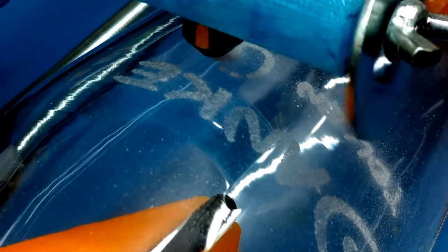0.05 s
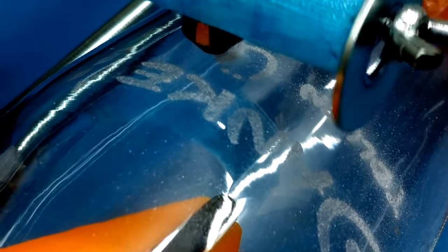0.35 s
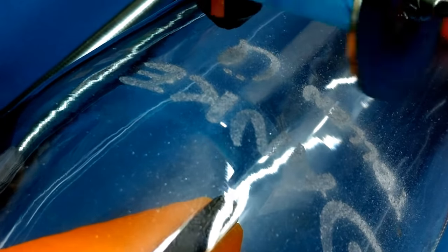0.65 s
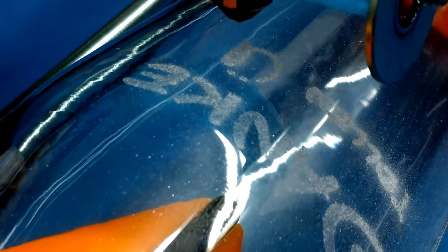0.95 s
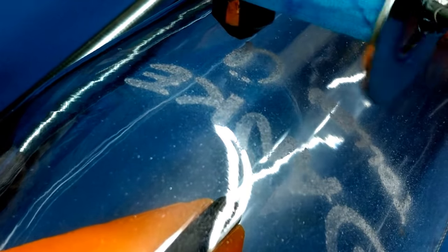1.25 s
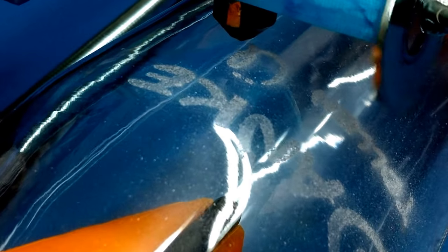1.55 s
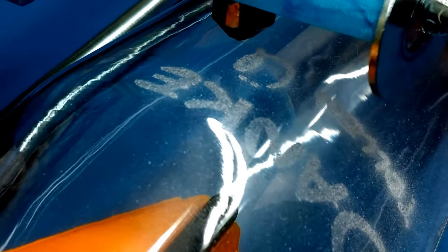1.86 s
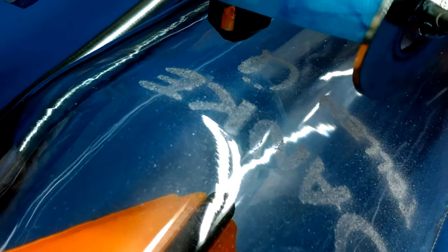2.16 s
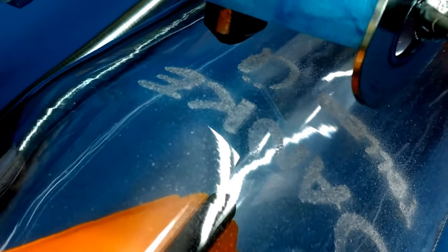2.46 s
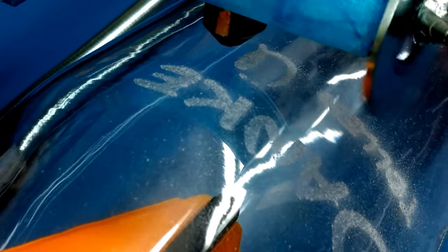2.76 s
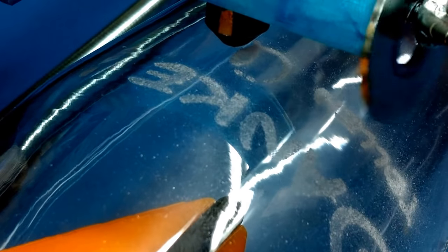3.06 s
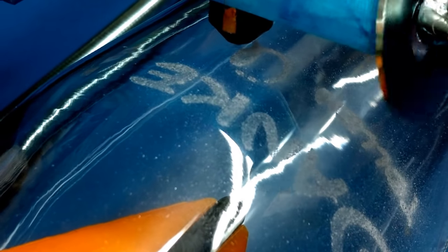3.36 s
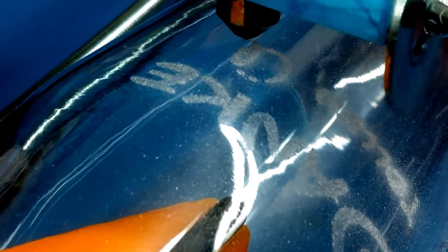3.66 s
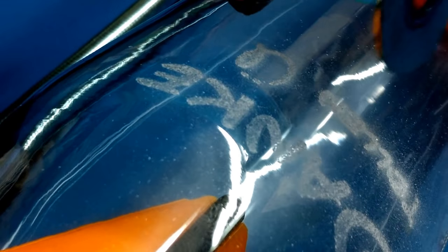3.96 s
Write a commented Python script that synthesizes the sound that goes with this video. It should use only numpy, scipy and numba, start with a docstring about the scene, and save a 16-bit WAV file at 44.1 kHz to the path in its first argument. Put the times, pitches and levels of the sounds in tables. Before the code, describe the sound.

Glass rings shrilly in uneven swells as an engraving tool scrapes it, heard close up without any room sound. After a brief stroke the motor hums, whistles and hisses alone, until a tick starts a second, longer stretch of grinding.

```python
"""A glass vessel rings loudly in its own modes as a small rotary engraver grinds letters into its wall.
The gritty burr chatters and scrapes, and the ring swells irregularly. The burr lifts and the ring dies,
then it lands with a tick for a second, longer stroke. The motor hums, whistles and hisses throughout.
Heard close to the vessel, through the two microphone ports of a camera, with no room sound."""
import sys
import numpy as np
from scipy import signal
from scipy.fft import rfft, irfft
from scipy.io import wavfile
from numba import njit

SR = 44100
rng = np.random.default_rng(int(sys.argv[2]) if len(sys.argv) > 2 else 0)


def inscribe(sig):
    """Save sig as 16-bit PCM at rate SR to the path in sys.argv[1].

    A 1-D sig is mono; a 2-D sig holds one channel per row.
    Samples are clipped to [-1, 1] before scaling.
    """
    pcm = np.round(np.clip(np.atleast_2d(sig).T, -1, 1) * 32767)
    wavfile.write(sys.argv[1], SR, pcm.astype(np.int16))


N = 176400
TIME, BINS = np.arange(N) / SR, np.fft.rfftfreq(N, 1 / SR)


def amp(db):
    """Decibels to gain."""
    return 10 ** (np.asarray(db) / 20)


def unit(x):
    """Scales to rms 1."""
    return x / np.sqrt(np.mean(x ** 2) + 1e-20)


def spectrum(points):
    """Reads a table on a log-frequency axis."""
    hz, value = np.transpose(points)
    return np.interp(np.log(BINS + 1), np.log(hz + 1), value)


def curve(rows, column=1):
    """Reads one column of a table over time."""
    rows = np.array(rows)
    return np.interp(TIME, rows[:, 0], rows[:, column])


def drift(rate_hz):
    """A random wander of rms 1, mostly slower than rate_hz."""
    return unit(irfft(rfft(rng.standard_normal(N)) / np.sqrt(1 + (BINS / rate_hz) ** 4), N))


def band(x, hz, width_hz):
    """A band-pass with gain 1 at its centre."""
    return signal.lfilter(*signal.iirpeak(hz, hz / width_hz, SR), x)


# How alike a noise arrives at the two microphone ports (frequency [Hz], likeness [0-1])
PORT_LIKENESS = [(100, 0), (500, 0.3), (1000, 1), (1400, 0.02), (2000, 0.99), (5000, 1), (9000, 0.32),
                 (14000, 1)]

def stereo_noise(pair, colour):
    """Two unrelated white signals become a partly alike left and right with the given spectrum."""
    left, other = rfft(pair)
    alike = np.clip(spectrum(PORT_LIKENESS), 0, 1)
    right = alike * left + np.sqrt(1 - alike ** 2) * other
    return irfft(np.array([left, right]) * amp(spectrum(colour)), N) * np.sqrt(SR / 2)


# Hiss of the brushes and fan, close up (frequency [Hz], density [dB per Hz])
HISS_SPECTRUM = [(30, -103), (100, -109), (300, -89.5), (520, -77), (1000, -82.5), (1400, -84.5),
                 (1900, -84), (3000, -78), (3900, -71.5), (4600, -81.5), (6300, -76), (8000, -76.5),
                 (9500, -81.5), (12600, -83), (13500, -80), (14400, -82), (15400, -98)]

def motor_hiss(turns):
    """Brushes and fan hiss, throbbing with each turn and fluttering at random."""
    throb = 1 + 0.13 * np.cos(2 * np.pi * turns)
    flutter = amp(1.83 * drift(rate_hz=35))
    return stereo_noise(rng.standard_normal((2, N)) * unit(throb * flutter), HISS_SPECTRUM)


# Thin whistles of the running tool (frequency [Hz], half-width [Hz], relative level [dB])
WHISTLE_BANDS = [(7858, 8, -50), (7982, 8, -52.5), (8220, 10, -54)]

def motor_whistles():
    """Very narrow bands of noise whistle high above the hum."""
    whistles = np.zeros(N)
    for hz, half_width, db in WHISTLE_BANDS:
        peak = rfft(rng.standard_normal(N)) / (1 + ((BINS - hz) / half_width) ** 2)
        whistles += amp(db) * unit(irfft(peak, N))
    return whistles


# Partials of the hum (multiple of shaft speed, relative level idling [dB], relative level cutting [dB])
SHAFT_ORDERS = [(1, -48, -51), (2, -45, -53), (3, -44, -57), (4, -57, -60), (5, -51, -47), (7, -52, -58),
                (9, -56, -58), (15, -52, -56), (16, -57, -62), (35, -49, -60), (36, -58, -68)]

def motor_hum(touch, turns):
    """The shaft hums at multiples of its speed; their balance shifts while the burr cuts."""
    hum = np.zeros(N)
    for order, idle_db, cut_db in SHAFT_ORDERS:
        level_db = idle_db + touch * (cut_db - idle_db) + 2.5 * drift(rate_hz=16.4)
        hum += amp(level_db) * np.sqrt(2) * np.sin(2 * np.pi * (order * turns + rng.random()))
    return hum


# The motor at the microphone as the tool moves (time [s], level [dB])
MOTOR_LEVEL = [(0, 1), (.35, -3.5), (.47, -2), (.8, 0.5), (1.13, 1.5), (1.22, -2), (1.5, -2.5), (3.7, -2.5),
               (3.8, -2), (4, -3)]

def motor(touch, turns, tones_db=-1):
    """The running tool is the background: hum, whistles and hiss swell and sink together."""
    tones = motor_hum(touch, turns) + motor_whistles()
    return (amp(tones_db) * tones + motor_hiss(turns)) * amp(curve(MOTOR_LEVEL))


# Strokes of the burr on the vessel's wall (touch [s], lift [s])
BURR_STROKES = [(-.1, 0.362), (1.217, 3.755)]

def release_hum(hz=160, swell_s=0.0287, lead_s=0.071):
    """The whole vessel swings softly as each stroke lets go."""
    hum = np.zeros(N)
    for _, lift in BURR_STROKES:
        age = np.maximum(TIME - lift + lead_s, 0)
        hum += age / swell_s * np.exp(-age / swell_s) * np.sin(2 * np.pi * hz * age)
    return amp(-39.5) * hum


def burr_contact(turns):
    """Contact force: a blow in each turn, loosely alternating strong and weak, and a slower chatter."""
    blows = np.exp(0.66 * (np.cos(2 * np.pi * turns) + np.cos(4 * np.pi * turns) / 2))
    skips = 1 + 0.54 * np.cos(2 * np.pi * (turns / 2 + 0.39 * drift(rate_hz=26)))
    chatter = amp(2 * drift(rate_hz=58.5))
    return unit(blows * skips * chatter)


def grit(grains_per_s=18000):
    """Diamond grains strike the glass at random, as equal impulses of either sign."""
    signs = rng.choice([-1, 1], N)
    return unit(signs * (rng.random(N) < grains_per_s / SR))


# Dull scraping of the burr, close up (frequency [Hz], density [dB per Hz])
SCRAPE_SPECTRUM = [(40, -106), (90, -99), (125, -88), (160, -77), (220, -73), (290, -84.5), (370, -72.5),
                   (470, -87), (700, -76.5), (950, -71), (1300, -72.5), (1700, -67.5), (2150, -80.5),
                   (2850, -66.5), (3600, -78.5), (4300, -85), (5500, -104), (8000, -77), (9400, -86.5),
                   (12400, -86.5), (13900, -98), (15500, -100)]

def burr_scrape(force):
    """Grains rasp over the wall, pulsing with the contact force."""
    return stereo_noise(np.array([grit(), grit()]) * force, SCRAPE_SPECTRUM)


# Knocks of the burr on the wall (time [s], kick to the modes [relative], tick level [dB])
BURR_KNOCKS = [(0.0892, 0.38, -4), (1.2189, 1, 1.5), (1.5559, 0.23, -10), (2.001, .3, -6),
               (2.1645, 0.15, -17)]
# Crack of a knock, close up (frequency [Hz], density [dB per Hz])
CRACK_SPECTRUM = [(100, -90), (450, -75), (1000, -49), (2000, -55), (6500, -54), (10000, -63), (15000, -74)]

def burr_knocks(crack_s=0.0036, clink_hz=2900, clink_db=-22, clink_decay_per_s=270):
    """Each knock ticks with a crack and a clink; returns the ticks and the kicks given to the glass."""
    kicks, envelope, clink = np.zeros((3, N))
    for start, kick, db in BURR_KNOCKS:
        age = np.maximum(TIME - start, 0)
        kicks[round(start * SR)] = kick
        envelope += (TIME > start) * amp(db) * np.exp(-age / crack_s)
        clink += amp(db + clink_db) * np.exp(-age * clink_decay_per_s) * np.sin(2 * np.pi * clink_hz * age)
    crack = stereo_noise(rng.standard_normal((2, N)) * envelope, CRACK_SPECTRUM)
    return crack + band(clink, clink_hz, clink_hz / 2), kicks


# Brief, irregular swells in the glass's ringing (start [s], length [s], strength [relative])
RING_SWELLS = [(0.112, 0.034, 3), (.212, 0.013, 2.8), (1.383, 0.082, 4.8), (1.53, 0.0052, 0.97),
               (1.825, 0.012, 0.7), (1.911, .01, 0.77), (2.083, 0.041, 1.9), (2.326, 0.012, 0.4),
               (2.523, 0.0071, 1.26), (2.689, 0.014, 1.9), (2.762, 0.02, 1.3), (2.817, 0.0076, 1.25),
               (2.888, 0.0244, 2.0), (2.92, 0.038, 1.2), (3.025, .024, 0.43), (3.125, .026, 1.5),
               (3.187, 0.011, 0.58), (3.323, 0.023, 1.4), (3.546, 0.028, 0.71)]

def ring_swells():
    """The ringing swells briefly: each swell is a push to the modes, spread evenly over its length."""
    return 1.46 * sum(strength / (length * SR) * ((TIME > start) & (TIME < start + length))
                      for start, length, strength in RING_SWELLS)


@njit
def glass_mode(force, push, touch, phase_step, damping):
    """One mode: push widens its swing; the touching burr damps it, more so the wider it swings."""
    free, swing_share = 0.62, 0.35  # shares of damping: left with the burr lifted, growing with the swing
    motion, state, rotation = np.zeros(len(force)), 0j, np.exp(1j * phase_step)
    for i in range(len(force)):
        swing = abs(state) + 1e-12
        loaded = 1 - swing_share + swing_share * swing ** 2
        decay = np.exp(-damping * (free + touch[i] * (loaded - free)))
        state = state * (1 + push[i] / swing) * rotation * decay + force[i]
        motion[i] = state.real - force[i] / 2
    return motion * np.sqrt(2)


# Modes of the vessel (frequency [Hz], nominal width under the burr [Hz], relative level [dB], polarity)
GLASS_MODES = [(158, 12, -58, 1), (1131, 18, -37.5, 1), (2394, 22, -39, 1), (2663, 15, -16, 1),
               (3821, 13, -36, 1), (4657, 20, -30, 1), (4928, 44, -28.5, -1), (5919, 24, -26.5, -1),
               (6430, 180, -45, 1), (7120, 70, -44, 1), (7405, 28, -33.5, -1), (8570, 100, -42, 1),
               (10020, 60, -47, 1), (12350, 350, -47, 1), (13170, 100, -52, 1)]
# The high modes at the microphone as the burr moves over the wall (time [s], level [dB])
HIGH_MODE_LEVEL = [(.2, -5), (1.3, -1.5), (1.8, 0.5), (3.6, -1.5)]

def glass_ring(grinding, kicks, touch, swell_hz=2870, swell_half_width_hz=2500, high_from_hz=5400):
    """Grit and knocks ring the vessel; the swells are strongest in the modes near swell_hz."""
    ring, swells = np.zeros(N), ring_swells()
    high_gain = amp(curve(HIGH_MODE_LEVEL) + 2.5 * drift(rate_hz=22))  # the high modes stutter together
    for hz, width_hz, db, polarity in GLASS_MODES:
        damping = np.pi * width_hz / SR
        force = grinding * np.sqrt(2 * damping) + kicks
        push = swells / (1 + ((hz - swell_hz) / swell_half_width_hz) ** 2)
        motion = glass_mode(force, push, touch, 2 * np.pi * hz / SR, damping)
        if hz > high_from_hz:
            motion *= high_gain
        treble_db = 1.5 if hz > 1.5 * swell_hz else 0
        radiated = band(motion, hz, width_hz=min(694, hz / 2))  # only near the mode's own pitch
        ring += polarity * amp(db + treble_db) * radiated
    return ring


# How hard the burr is pressed to the wall (time [s], scrape level [dB], ring level [dB])
HAND_PRESSURE = [(0, 8.5, -1.5), (.12, 3, 0.5), (.18, 4, -4.5), (.33, 4.5, -1.5), (1.22, 0.5, -3.5),
                 (1.34, 0, -6), (1.5, 3, -3), (1.87, 3, -1), (2.28, 4, -2.5), (2.5, 4, -2.5),
                 (2.92, 5, -0.5), (3.21, 4.5, 0), (3.29, 5, -2.5), (3.62, 3.5, 2), (3.72, -0.5, -9)]

def engraving(touch, turns):
    """In the foreground the chattering burr scrapes, knocks and rings the glass."""
    force = touch * burr_contact(turns)
    ticks, kicks = burr_knocks()
    scrape = burr_scrape(force * amp(curve(HAND_PRESSURE, column=1)))
    ring = glass_ring(force * grit(), kicks, touch) * amp(curve(HAND_PRESSURE, column=2))
    return scrape + ticks + ring


# Speed of the engraver's shaft (time [s], speed [turns per s])
SHAFT_SPEED = [(0, 427), (.5, 425), (.75, 425), (.9, 426.5), (1.13, 426), (1.25, 429), (1.7, 427.5),
               (2.2, 429), (3.7, 428.5), (3.85, 426.5), (4, 430)]

def scene(land_s=0.0027, lift_s=0.078):
    """One slightly wobbling shaft drives the motor's hum and the burr, which meets the glass in strokes."""
    touch = sum(np.clip(np.minimum((TIME - on) / land_s, (off - TIME) / lift_s), 0, 1)
                for on, off in BURR_STROKES)
    speed = curve(SHAFT_SPEED) * (1 + 0.0032 * drift(rate_hz=60))
    turns = np.cumsum(speed) / SR
    return motor(touch, turns) + release_hum() + engraving(touch, turns)


# Lag of the left microphone port behind the right (frequency [Hz], lag [cycles])
LEFT_PORT_LAG = [(0, 0), (300, .12), (1150, .08), (1600, .5), (2750, 1), (4400, 2), (6200, 3), (7900, 4),
                 (9750, 5), (11700, 6), (14800, 7)]
# Balance of the two ports (frequency [Hz], left minus right [dB])
PORT_BALANCE = [(120, 4), (200, -0.5), (430, 9), (800, -1), (1130, 0), (1300, -5), (1650, -2), (2000, -0.5),
                (16000, 0)]

def record(dry, top_hz=15550):
    """Two microphone ports close to the vessel differ in delay and level; both cut off at top_hz."""
    lag = np.interp(BINS, *np.transpose(LEFT_PORT_LAG))
    tilt = amp(spectrum(PORT_BALANCE) / 2)
    responses = np.array([tilt * np.exp(-2j * np.pi * lag), 1 / tilt])
    impulses = np.roll(irfft(responses, N), 1024, axis=1)[:, :2049]
    heard = signal.oaconvolve(dry, impulses, "same", axes=1)
    lowpass = signal.firwin(511, top_hz, window=("kaiser", 9), fs=SR)
    return signal.oaconvolve(heard, lowpass[None], "same")


dry = scene()
out = record(dry)
inscribe(out)
```